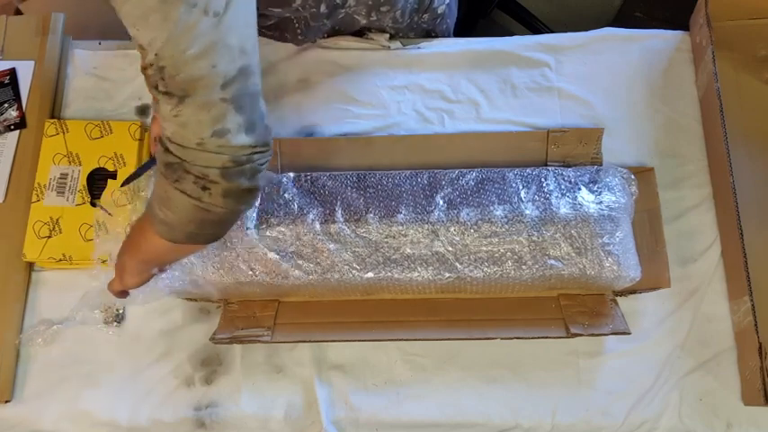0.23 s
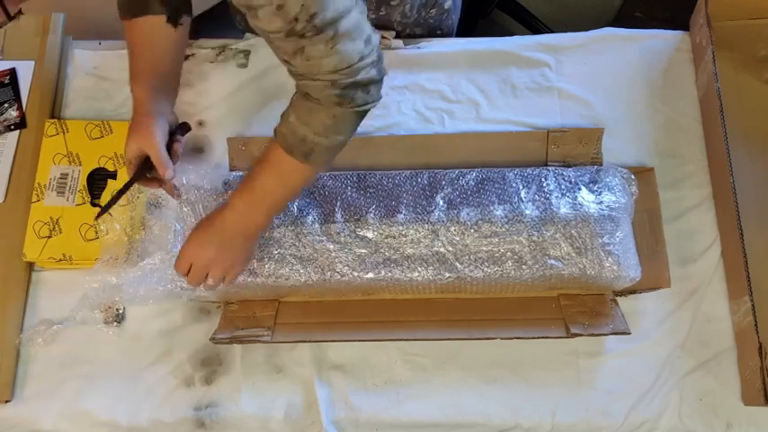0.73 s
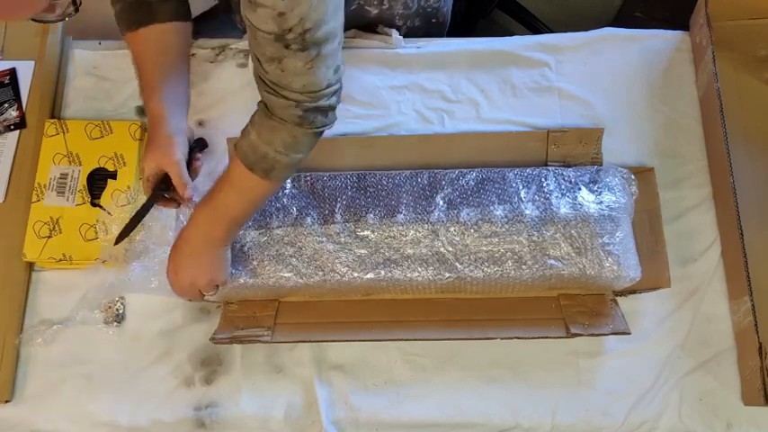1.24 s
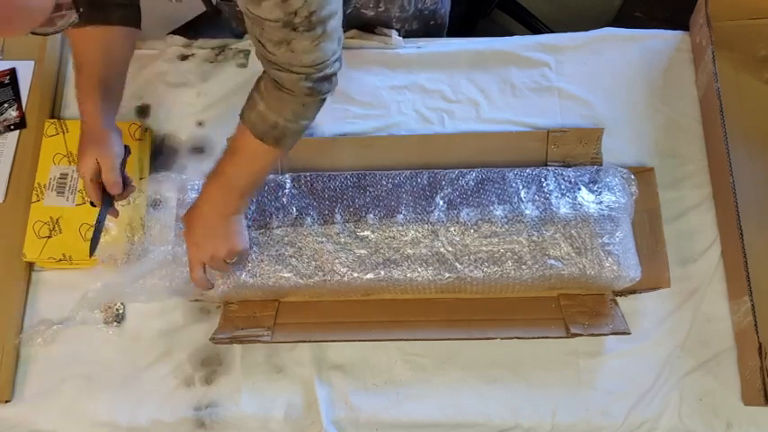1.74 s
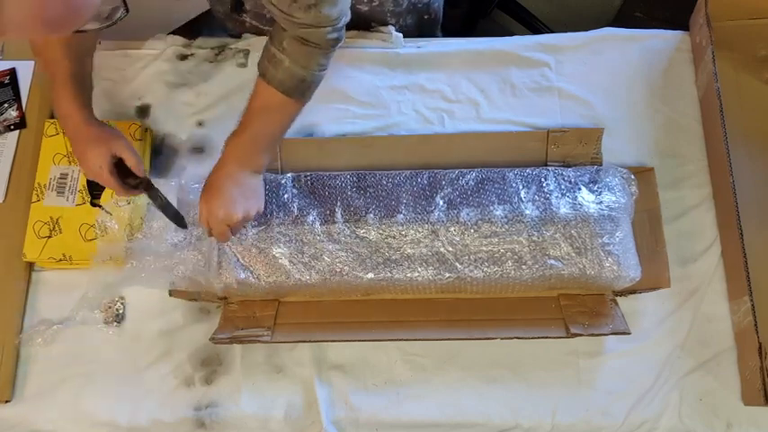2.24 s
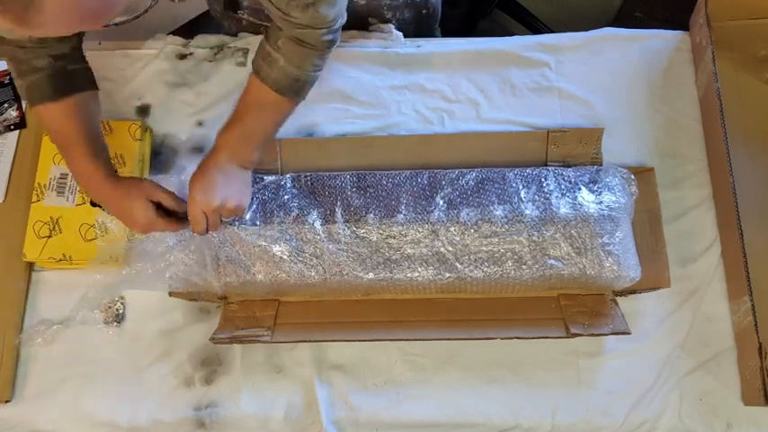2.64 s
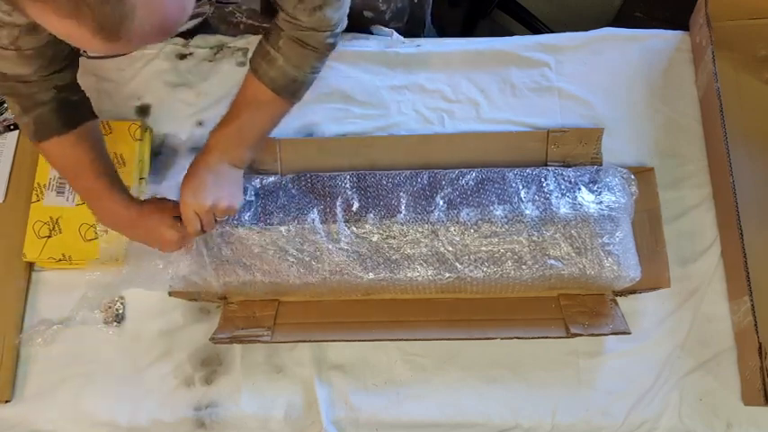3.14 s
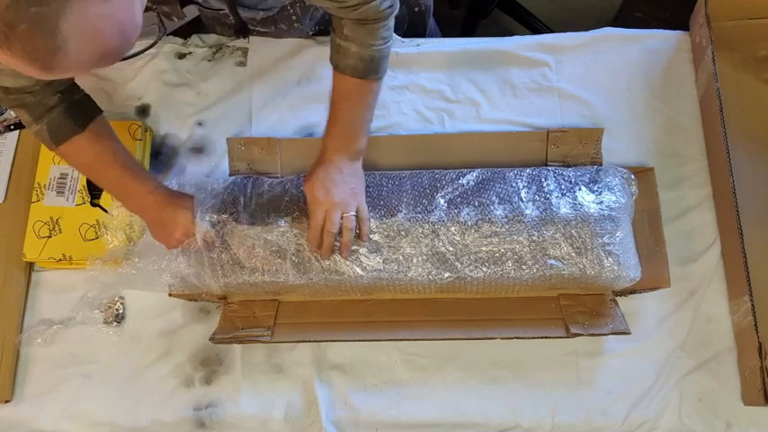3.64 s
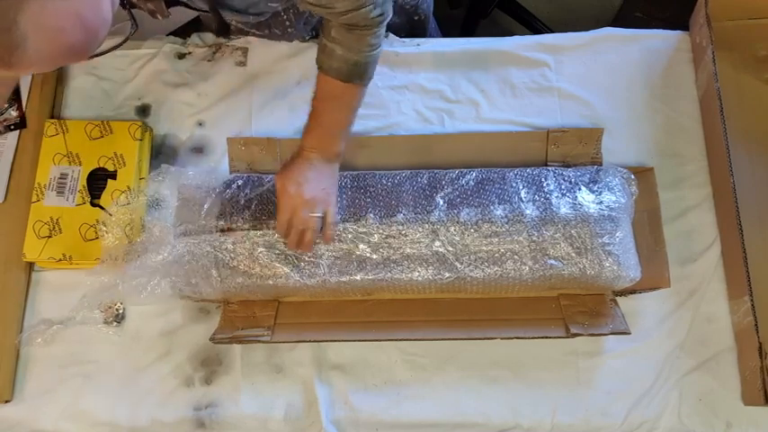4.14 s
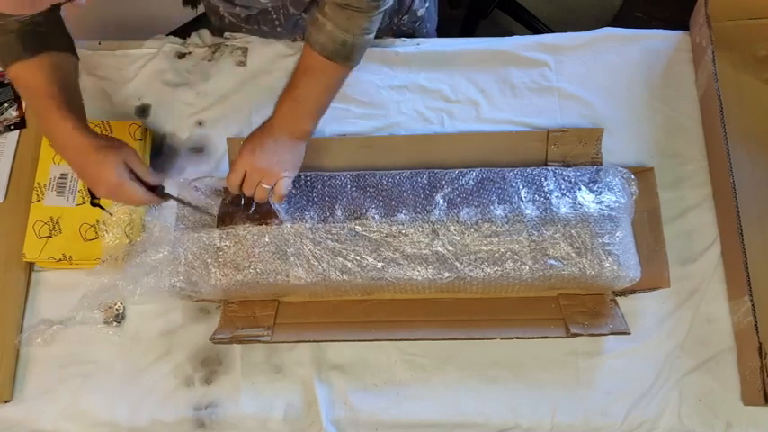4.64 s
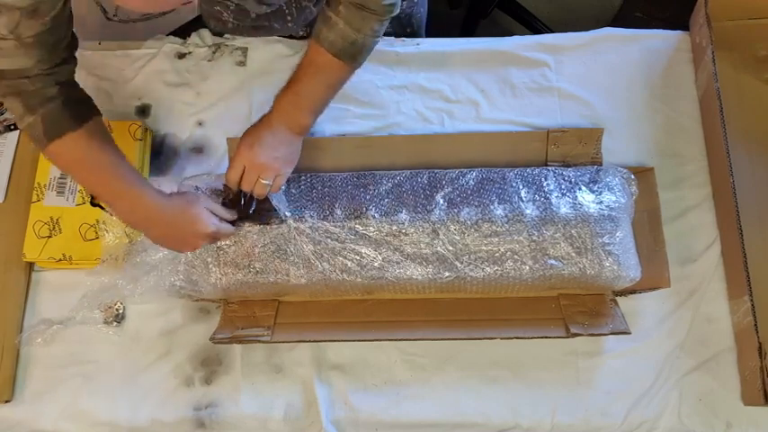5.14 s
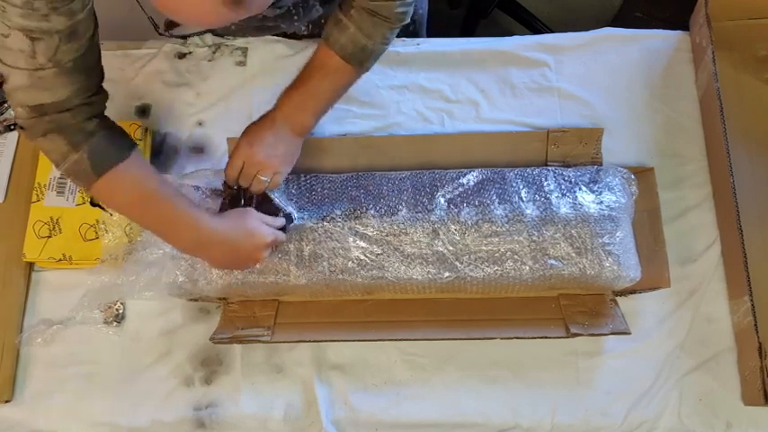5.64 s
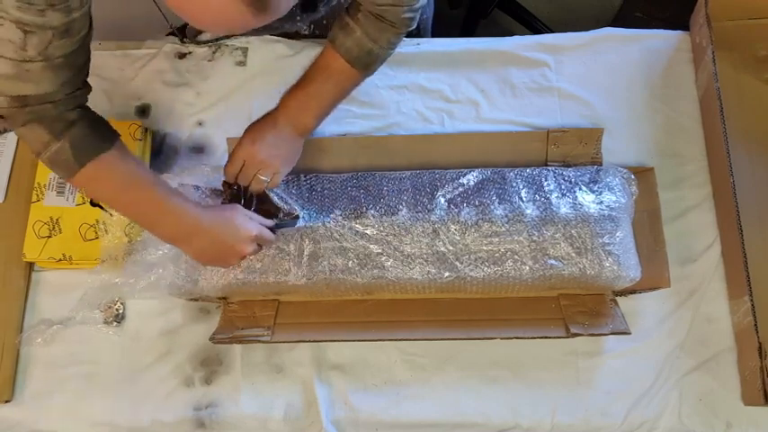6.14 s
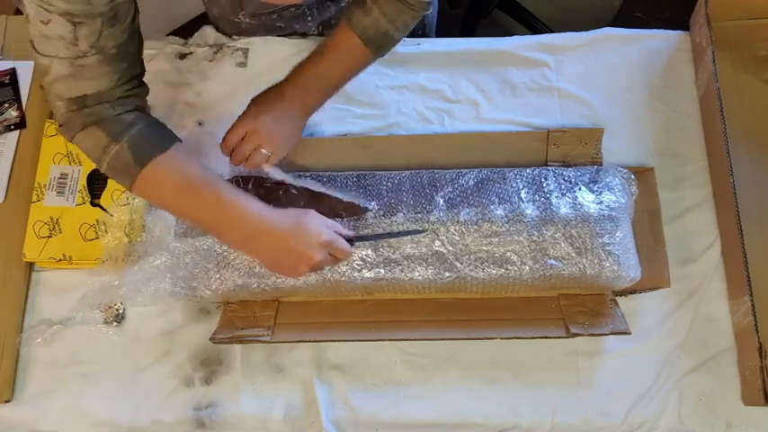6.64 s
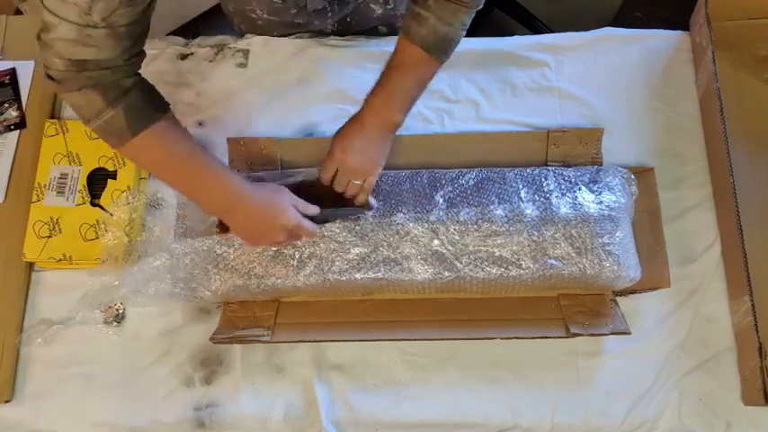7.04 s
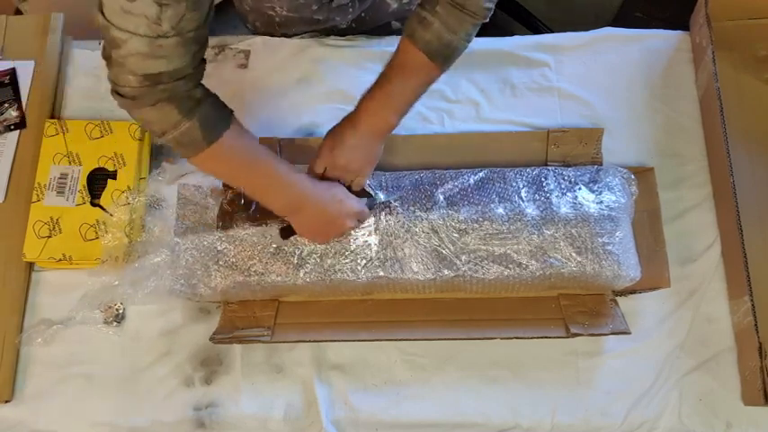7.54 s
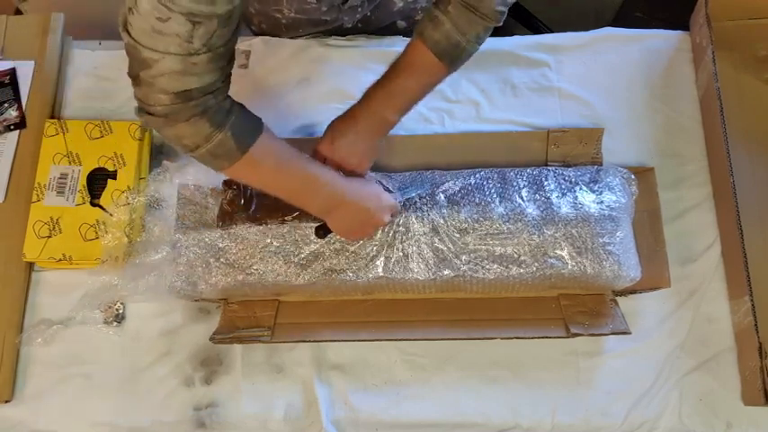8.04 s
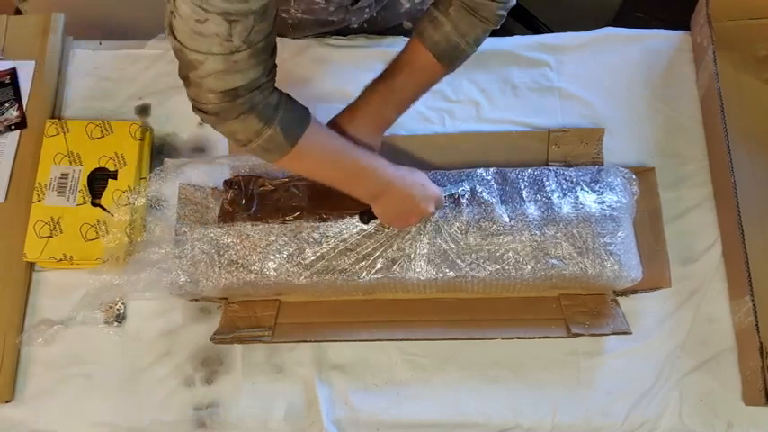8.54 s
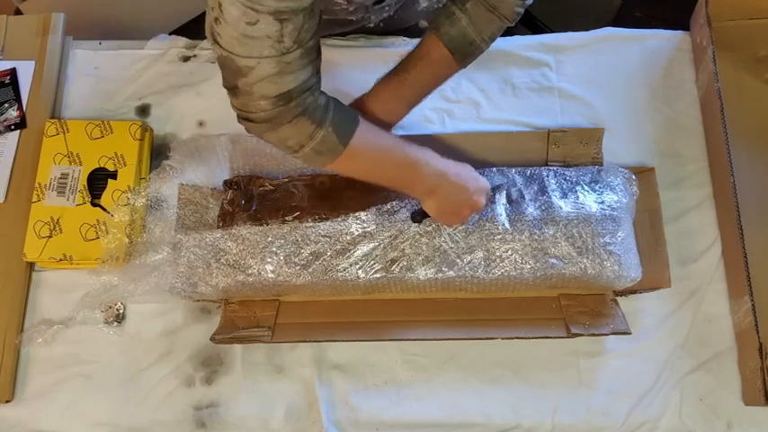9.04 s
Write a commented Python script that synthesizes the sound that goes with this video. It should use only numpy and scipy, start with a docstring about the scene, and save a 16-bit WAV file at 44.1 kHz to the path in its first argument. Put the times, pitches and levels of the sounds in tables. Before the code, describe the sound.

Bubble wrap rustles and pops sharply in quick runs as a knife slits it, with faint squeaks, in a bare workshop.

```python
"""Bubble wrap pops, singly and in quick runs, amid rustling film and faint squeaks.
A knife slits the wrap around a board that lies in an open carton on a workshop table.
Bubbles burst, creases snap under the hands, and the blade rasps, sticks and taps the board.
The parcel bumps on the table; the bare room rings after every pop. Heard in stereo from above."""
import sys
import numpy as np
from scipy import signal
from scipy.fft import rfft, irfft, next_fast_len
from scipy.io import wavfile
from scipy.ndimage import uniform_filter1d, map_coordinates

SR = 44100
rng = np.random.default_rng(int(sys.argv[2]) if len(sys.argv) > 2 else 0)


def to_wav(s):
    """Save 16-bit WAV."""
    ch = np.atleast_2d(s).T  # columns
    pcm = np.round(np.clip(ch, -1, 1) * 32767)  # PCM
    wavfile.write(sys.argv[1], SR, pcm.astype(np.int16))


N = 410130
HOP = 128  # samples per STFT step
BANDS_HZ = np.fft.rfftfreq(2 * HOP, 1 / SR)[:, None]
# workshop reverberation: f/Hz, t60/s
ROOM_DECAY = [(150, 0.45), (400, 0.4), (1000, 0.44), (2800, 0.47), (7000, 0.45), (14000, 0.46)]


def pops():
    """Bubbles burst under the blade; taut creases snap over, thin and bright."""
    # bubbles: t/s, level/dB, f/Hz, thump/dB, crack/dB
    bubbles = [(3.3977, -22.5, 1940, -2.5, -12.5), (3.614, -5.5, 2480, -5, -10.5),
               (3.626, -7.5, 2040, -13, -30), (3.674, -8, 2580, -5.5, -18), (3.852, -33, 2350, 10.5, 4),
               (3.8588, -10, 2640, -5, -11), (3.8675, -13.5, 2700, -0.5, -30),
               (3.9072, -7, 2330, -2.5, -8.5), (3.9147, -7.5, 2880, -5, -22), (3.9195, -22.5, 2420, 6, -11),
               (6.2526, -23.5, 1380, -1, -1.5), (6.2566, -12, 1330, -14, -25),
               (6.2731, -14, 1670, -12, -31), (6.2879, -9, 2200, -6.5, -12.5),
               (6.3258, -5, 3130, -8.5, -34), (6.34, -13.5, 1790, -1, -13), (6.3467, -9, 2290, -11.5, -17),
               (7.5719, -11.5, 2420, -8, -13), (8.1092, -18, 2350, -1, -20), (8.1284, -27, 2480, -5, -14),
               (8.1707, -18.5, 2650, -6, -21), (8.7563, -22.5, 1840, -1.5, -9),
               (8.7737, -20, 2920, -4, -12), (8.789, -13.5, 1720, 0, -12), (8.7983, -13, 1520, 3, -8),
               (8.8026, -6.5, 2840, -5.5, -33), (8.809, -13.5, 2070, 0.5, -4.5),
               (8.8589, -16, 1640, 0, -18)]
    # creases: t/s, level/dB, f/Hz, crack/dB
    snaps = [(.055, -36, 2600, -16), (0.399, -33.5, 2840, -9), (0.963, -44.5, 1700, -9),
             (3.045, -34.5, 2300, -10), (3.207, -46, 1790, -17), (3.364, -24, 3460, -7.5),
             (3.4071, -24, 2750, -17), (4.566, -37, 1900, -15), (5.4505, -21.5, 2650, -3),
             (5.5923, -32, 2400, -12), (5.644, -36, 2030, -14), (5.811, -33, 3100, -6.5),
             (6.563, -34, 3230, -0.5), (7.3996, -35.5, 2300, -19), (9.0576, -32, 3300, -8)]
    # a run starts under the wrap, heard mostly via the room, and grows more direct as the slit opens
    run_s, covered_db, opening_db_per_s = 0.15, 2.5, 63
    events = []
    for s, db, hz, thump_db, crack_db in bubbles:
        run_start_s = min(row[0] for row in bubbles if row[0] > s - run_s)
        room_db = covered_db - opening_db_per_s * (s - run_start_s)
        events.append((s, burst(db, hz, thump_db, crack_db, room_db)))
    for s, db, hz, crack_db in snaps:  # a crease barely moves the parcel
        events.append((s, burst(db, hz, thump_db=-15.5, crack_db=crack_db, room_db=1.5)))
    direct, echo = np.zeros(N), np.zeros((2, N))
    for s, (near, far) in events:
        add(direct, s, near)
        add(echo, s, far)
    return direct, echo


def burst(db, hz, thump_db, crack_db, room_db, decay_cycles=0.4, shred_s=0.0012):
    """Film gives way: a brief swing of air, a crack and a thump into the parcel. Returns direct, echo."""
    # padded parcel: f/Hz, level/dB, t60/s
    parcel_modes = [(170, -10, 0.073), (353, 10, 0.047), (542, 17, 0.015), (777, -22, 0.0014)]
    # breaking film: f/Hz, level/dB
    crack_spectrum = [(2500, -5.5), (5000, 8), (7000, 7), (8500, 4), (14000, 1), (17000, -16.5)]
    t = np.arange(SR // 40) / SR
    age = t * hz / decay_cycles
    puff = unit_energy(np.sqrt(age) * np.exp(-age) * np.sin(2 * np.pi * hz * t))
    thump = unit_energy(ringing(parcel_modes, t, detune=0.12))
    body = amp(-3.5) * puff - amp(thump_db - 1) * thump
    # one sharp break, then the edges of the hole shred
    split = signal.unit_impulse(len(t), SR // 4000)
    shreds = 0.39 * rng.standard_normal(len(t)) * np.exp(-t / shred_s)
    pop = body + amp(crack_db - 2) * unit_energy(coloured(split + shreds, crack_spectrum))
    # the room gathers the crack from all directions, which evens out its colour
    gathered = body + amp(crack_db - 9.5) * unit_energy(coloured(split, crack_spectrum))
    gain = amp(db) * np.sqrt(SR / 1000)  # unit energy to rms 1 over 1 ms
    return gain * (pop + bounced(pop)), gain * amp(room_db) * in_room(gathered)


def taps(room_db=-5):
    """The blade knocks the board through the wrap; its modes ring hollow."""
    # knocks: t/s, peak/dB
    knocks = [(2.8676, -23.5), (2.9972, -29.5), (7.265, -41.5), (7.452, -37)]
    # board: f/Hz, level/dB, t60/s
    board_modes = [(645, -3, 0.068), (753, 3, 0.035), (1240, 7.5, 0.033), (1800, -8, 0.047)]
    out, t = np.zeros(N), np.arange(SR // 5) / SR
    for s, db in knocks:
        ring = ringing(board_modes, t, detune=0.028)
        add(out, s, amp(db) * ring / np.abs(ring).max())
    return out, amp(room_db) * in_room(out)[:, :N]


def rustle(fizz_db=-2, direct_db=-3):
    """Handled film: a dull rub from the parcel, crinkle and fine fizz from the creases."""
    # spectra of the three layers: f/Hz, level/dB
    rub_spectrum = [(120, 1), (220, 4.5), (400, 6), (620, 0), (1100, -1.5), (1700, -6.5), (3000, -48.5)]
    crinkle_spectrum = [(600, -70), (1300, -16), (2300, 4.5), (3200, -2), (4300, -2.5), (6500, -28)]
    fizz_spectrum = [(2500, 0.5), (4200, -10.5), (5500, -2), (7000, -5), (8200, -12.5), (10500, -10),
                     (13500, -14), (16000, -23)]
    rub, crinkle, fizz = hand_envelopes()
    folds = 0.42 * unit_rms(clicks(per_s=50, spread_db=2.5, clump_db=1))  # larger folds flip over
    creases = unit_rms(clicks(per_s=1800, spread_db=1, clump_db=2)) + folds
    fine = unit_rms(clicks(per_s=3100, spread_db=5, clump_db=1.5))
    film = rub * coloured(clicks(per_s=2500, spread_db=2, clump_db=0), rub_spectrum)
    film += crinkle * coloured(creases, crinkle_spectrum)
    film += amp(fizz_db) * fizz * coloured(creases + fine, fizz_spectrum)
    return amp(direct_db) * film, scattered(film)


def hand_envelopes(rest_db=-76, rest_press_db=7):
    """Gains of rub, crinkle and fizz: all follow the strokes; pressing adds rub and takes away fizz."""
    # pushes and pulls: t/s, length/s, level/dB, pressing/dB
    strokes = [(-.02, 0.1, -48.5, 3.5), (0.102, 0.18, -52, -3.5), (0.295, .12, -53, 0.5),
               (0.504, 0.13, -58.5, -3), (0.7, 0.29, -80.5, 16), (0.81, 0.091, -59.5, 1),
               (.97, .27, -57, 0), (1.215, .13, -50.5, 1), (1.47, .23, -64, 1), (1.72, .26, -55, -1),
               (1.98, .17, -58, 0), (2.173, 0.31, -62, 0), (2.449, 0.046, -53.5, 3),
               (2.589, 0.14, -56, 2.5), (2.778, 0.23, -57, 2.5), (3.007, 0.15, -53.5, 1.5),
               (3.168, 0.6, -60, 2.5), (3.333, 0.54, -59.5, 5.5), (4.177, 0.23, -60, 1.5),
               (4.356, 0.33, -58.5, 0), (4.894, 0.46, -72.5, 7.5), (5.216, .24, -59.5, -4),
               (5.518, 0.38, -67, -24), (5.754, 0.14, -55.5, -7), (5.965, 0.13, -57.5, -11.5),
               (6.195, 0.076, -48.5, 3), (6.552, .07, -54, -4.5), (6.847, .12, -50, 4.5),
               (7.024, 0.083, -48.5, 1), (7.113, 0.16, -59, 3), (7.22, 0.059, -62, 11),
               (7.412, 0.3, -58, 6), (7.733, 0.056, -56.5, -13), (7.852, 0.043, -57.5, -11),
               (8.038, 0.11, -50, 0.5), (8.206, 0.19, -57, -0.5), (8.362, 0.069, -46.5, 3.5),
               (8.552, 0.087, -52, -0.5), (8.707, .36, -51.5, 4.5), (9.165, 0.11, -56, 2.5)]
    press_slopes = np.array([[1], [0], [-0.11]])  # dB per dB of pressing
    power = amp(rest_db + rest_press_db * press_slopes) ** 2  # the film never lies quite still
    for s, length_s, db, press_db in strokes:
        stroke = gesture(s, length_s, attack_s=0.056, release_s=0.069, sag_db=3.5)
        power = power + (amp(db + press_db * press_slopes) * stroke) ** 2
    return np.sqrt(power)


def rasp(direct_db=-5, room_db=-1.5):
    """The sawing edge catches in the taut film many times a second."""
    # cuts: t/s, length/s, level/dB
    cuts = [(4.94, 0.57, -57), (5.409, 0.19, -48.5), (5.587, 0.23, -56), (5.96, 0.45, -58),
            (7.393, 0.24, -51.5)]
    # blade and taut film: f/Hz, width/Hz, level/dB
    blade_peaks = [(1100, 400, 0), (2100, 820, 1), (2420, 97, -2)]
    snags = clicks(per_s=830, spread_db=2, clump_db=4.5)
    catches = unit_rms(filtered(snags, lambda hz: resonant(hz, blade_peaks) ** 2))
    sawing = sum(amp(db) * gesture(s, length_s, attack_s=0.17, release_s=0.02)
                 for s, length_s, db in cuts)
    out = sawing * catches
    return amp(direct_db) * out, amp(room_db) * scattered(out)


def squeaks(waver=0.054, sag=0.0078, flutter_db=2.5, direct_db=-4, room_db=-3):
    """Stretched film sticks and slips on steel; the pitch sags as the film slackens."""
    # squeaks: t/s, length/s, f/Hz, level/dB
    slips = [(1.212, 0.11, 965, -52.5), (4.378, 0.14, 612, -54), (4.646, 0.17, 565, -61.5),
             (6.02, 0.11, 1135, -61.5), (6.182, 0.075, 1150, -52), (6.873, 0.074, 610, -52),
             (7.2, 0.32, 792, -61)]
    out, drift = np.zeros(N), wobble(per_s=240)
    for s, length_s, pitch_hz, db in slips:
        n = int(length_s * SR)
        hz = pitch_hz * np.linspace(1, 1 - sag, n) * (1 + waver * drift[int(s * SR):][:n])
        tone = np.sin(2 * np.pi * np.cumsum(hz) / SR)
        add(out, s, amp(db) * unit_rms(tone * signal.windows.tukey(n, 0.5)))
    out *= unit_rms(amp(flutter_db * wobble(per_s=220)))
    return amp(direct_db) * out, amp(room_db) * in_room(out)[:, :N]


def table(rise_s=0.013, apart_db=-17):
    """The parcel bumps softly on the leaned-on table, which rumbles nearly alike on both sides."""
    # parcel bumps: t/s, level/dB, f/Hz
    bumps = [(0.009, -39.5, 172), (0.327, -37.5, 141), (3.106, -31, 123), (3.235, -41.5, 141),
             (3.669, -31.5, 239), (3.909, -29.5, 129), (4.439, -48.5, 144.4), (8.1, -33, 114),
             (8.437, -46, 120), (8.793, -26.5, 236.6), (9.16, -43, 156)]
    # rumble strength: t/s, level/dB
    rumble_levels = [(0, -49.5), (.8, -57.5), (3.4, -52), (3.7, -45), (4.4, -58.5), (6.7, -64.5),
                     (8.6, -62.5), (9.3, -54.5)]
    # rumble and bump noise spectra: f/Hz, level/dB
    rumble_spectrum = [(20, 2), (32, -28), (48, 3), (64, 2.5), (85, 1), (120, -13), (170, -8), (260, -22),
                       (600, -69)]
    thud_spectrum = [(40, 10), (150, 1), (300, -5.5), (700, -52)]
    shake = rng.standard_normal(N) + amp(apart_db) * rng.standard_normal((2, N))
    rumble_db = over_time(rumble_levels) + 4 + 0.67 * wobble(per_s=25)
    out = amp(rumble_db) * coloured(shake, rumble_spectrum)
    t = np.arange(SR // 4) / SR
    swell = t / rise_s * np.exp(1 - t / rise_s)
    for s, db, hz in bumps:
        thud = 0.48 * coloured(rng.standard_normal(len(t)), thud_spectrum)
        add(out, s, amp(db - 1) * swell * (np.sin(2 * np.pi * hz * t) + thud))
    return out


def bounced(pop):
    """Table, carton flaps and arms return dull copies, on paths that differ from pop to pop."""
    # reflections: delay/ms, level/dB
    paths = [(.9, -16), (2.1, -11), (3.402, -6), (5.2, -12), (8.2, -21.5)]
    # their colour: f/Hz, gain/dB
    surface_gains = [(100, -29), (600, 5), (1400, -7), (3000, -0.5), (7000, -17)]
    copies = np.zeros(len(pop))
    for ms, db in paths:
        lag = int(ms * rng.uniform(0.75, 1.25) * SR / 1000)
        copies[lag:] += amp(db) * pop[:len(pop) - lag]
    return filtered(copies, lambda hz: amp(along(surface_gains, hz)))


def in_room(x, build_s=0.00043, early_db=3, early_s=0.0028):
    """Stereo echo of x from a fresh room response, near walls first."""
    frame_s = np.arange(0, SR // 2, HOP) / SR
    tail = diffuse(amp(-60 * frame_s / along(ROOM_DECAY, BANDS_HZ)))
    t = np.arange(tail.shape[1]) / SR
    tail = tail * (1 - np.exp(-t / build_s)) * amp(early_db * np.exp(-t / early_s))
    response = carton_and_walls(np.sqrt(2) * unit_energy(tail))
    return signal.fftconvolve(x[None], response, axes=1)


def scattered(x, early_db=14, early_s=0.013, patch_db=1.7):
    """The sheet keeps changing shape, so its sound reaches the room by ever new paths and colours."""
    power = np.abs(signal.stft(x, nperseg=2 * HOP)[2]) ** 2
    power = uniform_filter1d(power, size=3, axis=0)
    t = np.arange(0, SR // 2, HOP) / SR
    lingering = amp(early_db * np.exp(-t / early_s) - 60 * t / along(ROOM_DECAY, BANDS_HZ)) ** 2
    gain = np.sqrt(np.abs(signal.fftconvolve(power, lingering, axes=1)))
    patches = uniform_filter1d(rng.standard_normal(gain.shape), size=2, axis=0)
    patches = uniform_filter1d(patches, size=16, axis=1)
    echo = diffuse(gain * amp(patch_db * unit_rms(patches)))[:, :N]
    return carton_and_walls(unit_rms(echo) * np.std(x))


def carton_and_walls(x, ring_db=-8.5):
    """Sound rings the carton on its way out and takes on the colour of the walls."""
    # carton and board: f/Hz, width/Hz, level/dB
    carton_peaks = [(234, 20, -8), (370, 38, -3), (553, 6.9, 11.5), (644, 23, 6), (897, 18, -2)]
    # room colour: f/Hz, gain/dB
    wall_gains = [(35, -13), (80, -0.5), (250, -2), (600, -0.5), (1300, 0), (2500, -1.5), (4500, 6),
                  (8000, 6), (15000, 5)]
    ring = lambda hz: 1 + amp(ring_db) * resonant(hz, carton_peaks)
    return filtered(x, lambda hz: amp(along(wall_gains, hz)) * ring(hz))


def diffuse(gain, coherent_hz=1050):
    """Noise from all sides, with a gain per band and frame; the bass is alike at both microphones."""
    noise = rng.standard_normal((2, (gain.shape[1] - 1) * HOP))
    spectra = signal.stft(noise, nperseg=2 * HOP)[2] * gain
    angle = np.arccos(1 / (1 + (BANDS_HZ / coherent_hz) ** 2)) / 2
    mid, side = signal.istft(spectra * np.array([np.cos(angle), np.sin(angle)]), nperseg=2 * HOP)[1]
    return np.array([mid + side, mid - side])


def microphones(x):
    """Direct sound reaches the nearer microphone first."""
    # place of the hands: t/s, left lead/ms
    hand_place = [(0, 0.16), (3.7, .14), (5.5, .11), (9.3, -0.035)]
    shift = over_time(hand_place) * SR / 1000 / 2
    return np.array([map_coordinates(x, [np.arange(N) + sign * shift]) for sign in (1, -1)])


def air(db=-64):
    """Quiet hiss of the workshop."""
    # hiss: f/Hz, level/dB
    hiss_spectrum = [(88, 7), (150, 4.5), (637, -9), (1480, -21), (4080, -4.5), (11900, -29.5),
                     (14500, -31), (16000, -55)]
    return amp(db) * coloured(rng.standard_normal((2, N)) + rng.standard_normal(N), hiss_spectrum)


def clicks(per_s, spread_db, clump_db):
    """Tiny impulses of uneven size, louder in clumps."""
    at = rng.integers(0, N, int(per_s * N / SR))
    clumps = map_coordinates(rng.standard_normal(N // 700 + 4), [at / 700])
    size = amp(spread_db * np.minimum(rng.exponential(size=len(at)), 4) + clump_db * clumps)
    return np.bincount(at, size * rng.choice([-1, 1], len(at)), N)


def gesture(s, length_s, attack_s, release_s, sag_db=0):
    """Envelope of one movement: builds, slackens over its length, lets go."""
    out, t = np.zeros(N), np.arange(SR) / SR + max(0, -s)
    rise = np.sin(np.pi / 2 * np.minimum(t / attack_s, 1)) ** 2
    release = np.exp(-np.maximum(t - length_s, 0) / release_s)
    add(out, s, rise * amp(-sag_db * t / length_s) * release)
    return out


def ringing(modes, t, detune):
    """Damped modes, a little different at every blow."""
    return sum(amp(db + rng.normal(0, 1) - 60 * t / t60_s)
               * np.sin(2 * np.pi * hz * (1 + detune * rng.normal()) * t) for hz, db, t60_s in modes)


def resonant(hz, peaks):
    """Response of parallel band-pass resonances."""
    return sum(amp(db) * 1j * hz * width_hz / (centre_hz ** 2 - hz ** 2 + 1j * hz * width_hz)
               for centre_hz, width_hz, db in peaks)


def amp(db):
    return 10 ** (np.asarray(db) / 20)


def unit_rms(x):
    return x / np.sqrt(np.mean(x ** 2) + 1e-20)


def unit_energy(x):
    return x / np.sqrt(np.sum(x ** 2) + 1e-20)


def along(points, hz):
    """Read (f/Hz, value) points on a log axis."""
    f, values = np.transpose(points)
    return np.interp(np.log(hz + 1), np.log(f + 1), values)


def over_time(points):
    """Read (t/s, value) points at every sample."""
    return np.interp(np.arange(N) / SR, *np.transpose(points))


def wobble(per_s):
    """Smooth curve through random knots."""
    return map_coordinates(rng.standard_normal(int(N * per_s / SR) + 4), [np.arange(N) * per_s / SR])


def filtered(x, response):
    """Apply response(hz) by FFT."""
    n = x.shape[-1]
    m = next_fast_len(n + 4096)
    return irfft(rfft(x, m) * response(np.fft.rfftfreq(m, 1 / SR)), m)[..., :n]


def coloured(x, spectrum):
    """x shaped by the spectrum, at rms 1."""
    return unit_rms(filtered(x, lambda hz: amp(along(spectrum, hz))))


def add(track, s, x):
    """Mix x in from time s."""
    i = max(0, round(s * SR))
    track[..., i:i + x.shape[-1]] += x[..., :max(0, N - i)]


def scene():
    """Direct sound and echo of each source, over the table and the room's hiss."""
    direct, echo = zip(pops(), taps(), rustle(), rasp(), squeaks())
    return microphones(sum(direct)) + sum(echo) + table() + air()


def record(dry):
    """Peaks round off near full scale; the deepest bass and top treble are cut."""
    ceiling, low_hz, top_hz = 0.95, 28, 15900
    limited = dry / (1 + np.abs(dry / ceiling) ** 6) ** (1 / 6)
    return filtered(limited, lambda hz: 1j * hz / (low_hz + 1j * hz) / (1 + (hz / top_hz) ** 120))


dry = scene()
out = record(dry)
to_wav(out)
```